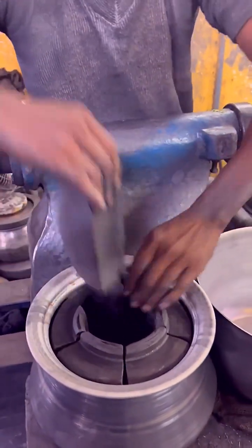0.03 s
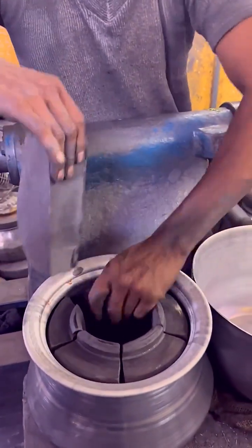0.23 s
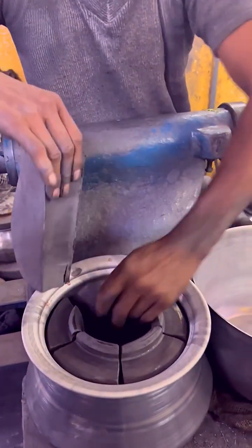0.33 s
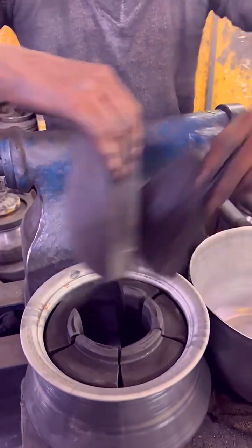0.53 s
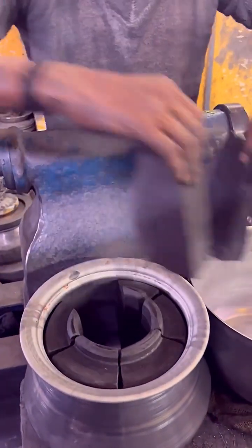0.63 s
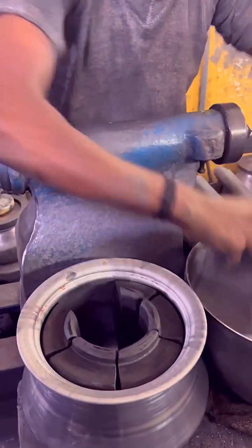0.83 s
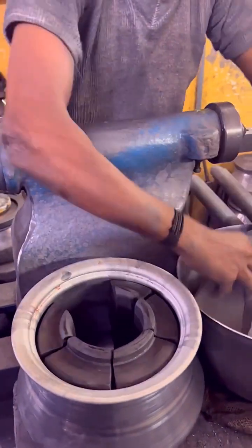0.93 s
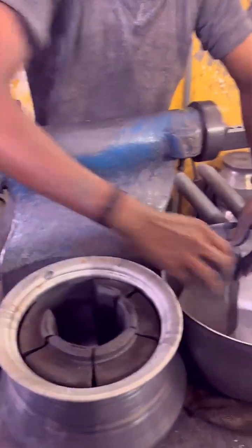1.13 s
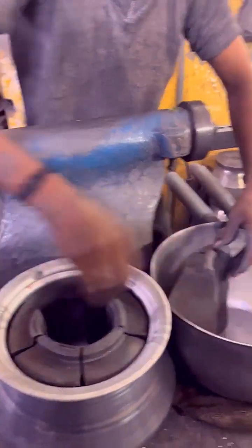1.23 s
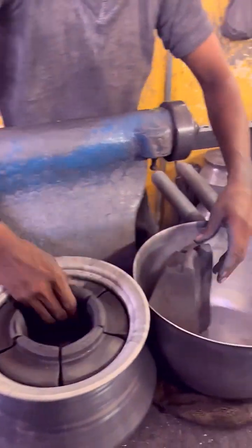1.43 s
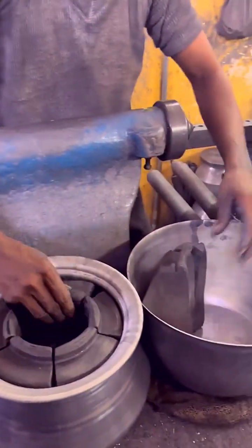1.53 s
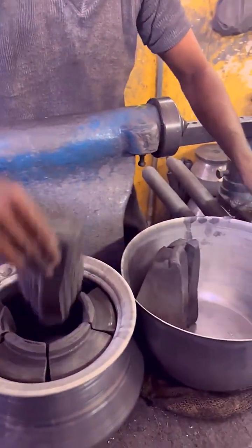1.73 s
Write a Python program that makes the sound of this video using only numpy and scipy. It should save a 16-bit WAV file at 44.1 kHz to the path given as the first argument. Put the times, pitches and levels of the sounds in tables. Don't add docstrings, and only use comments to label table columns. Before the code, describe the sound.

Heavy metal mould pieces knock, scrape and boom into a thin basin over low workshop machine rumble

```python
import sys
import numpy as np
from scipy import signal
from scipy.fft import rfft, irfft
from scipy.io import wavfile
from scipy.ndimage import uniform_filter1d

SR = 44100
rng = np.random.default_rng(int(sys.argv[2]) if len(sys.argv) > 2 else 0)


def field_ratio(decibels):
    return 10 ** (np.asarray(decibels, dtype=float) / 20)


def file_out(sig):
    cols = np.atleast_2d(sig).T
    lim = np.clip(cols, -1, 1)
    pcm = np.round(lim * 32767).astype(np.int16)
    wavfile.write(sys.argv[1], SR, pcm)


N = 79380
T = np.arange(N) / SR
F = np.fft.rfftfreq(N, 1 / SR) + 1


def read(table, col=1):
    a = np.array(table, float)
    return np.interp(np.log(F), np.log(a[:, 0]), a[:, col])


def unit(x):
    return x / np.sqrt(np.mean(x ** 2))


def ring(push, hz, t60):
    r = np.exp(-np.log(1000) / (max(t60, .004) * SR))
    gain = np.sqrt((1 - r * r) / 2)
    return signal.lfilter(gain * np.array([1, 0, -1]), [1, -2 * r * np.cos(2 * np.pi * hz / SR), r * r], push)


def burst(attack, decay, size=16384):
    t = np.arange(size) / SR
    rise = np.minimum(t / max(attack, 1e-4), 1)
    return rise * np.exp(-np.maximum(t - attack, 0) / max(decay, 1e-3))


def add(out, x, start, db):
    i = int(start * SR)
    x = x[:N - i]
    peak = np.sqrt(2 * uniform_filter1d(x ** 2, size=256).max())
    out[i:i + len(x)] += field_ratio(db) * x / peak


def walk(rate):
    k = int(SR / rate)
    held = np.repeat(rng.standard_normal(64), k)[:N]
    return 0.93 * uniform_filter1d(uniform_filter1d(held, k), k)


# start_s, level_db, pitch_hz,
# grit_level_db, grit_decay_s
KNOCKS = [(0.3296, -14, 1438, -19.5, 0.012), (.3626, -21.5, 2210, -22.5, 0.01),
          (0.532, -17.5, 1000, -24.5, 0.027), (0.539, -23, 1400, -33, 0.011), (0.38, -24, 1400, -35, .01),
          (.2195, -14, 2400, -33, .005), (.3935, -16, 2500, -27, .005), (.4625, -12, 2430, -23, 0.0055),
          (.692, -12.5, 2420, -25, 0.0044), (.917, -13, 1540, -26, 0.0046), (.944, -15, 850, -27, .004),
          (.778, -14.5, 772, -35, 0.0051), (.782, -10, 570, -39, .006), (.779, -21, 1345, -30, 0.022),
          (.790, -16, 765, -26.5, 0.027), (0.87, -21, 1420, -30, .01), (.861, -16, 750, -15, 0.0091),
          (.868, -22, 5500, -19, 0.0064), (.885, -22, 525, -23, .01), (.934, -13, 600, -18, 0.0056),
          (.928, -27, 2000, -21, 0.0055), (0.8564, -13, 2920, -8, 0.014), (0.9166, -6, 1200, -18, 0.025),
          (.943, -9, 1520, -13, 0.0059), (.961, -20.5, 1300, -15.5, 0.014),
          (.978, -23, 1470, -21.5, 0.0065), (1.055, -23, 780, -34, .015), (0.987, -24, 2890, -23, 0.067),
          (1.0375, -14, 2026, -17.5, 0.021), (1.069, -22, 1300, -30, 0.02),
          (1.3603, -23.5, 1970, -32, 0.033), (1.4464, -24.5, 1950, -32, 0.075),
          (1.41, -35, 1000, -41, 0.018), (1.507, -24.5, 1050, -49, 0.018), (1.635, -27, 1486, -34, 0.035)]
# ratio to pitch, level_db
KNOCK_PARTIALS = [(.8, -9.5), (0.998, 7), (1.13, -19), (1.329, -12.5)]
# freq_hz, level_db per Hz
GRIT_COLOUR = [(150, -22), (600, 4.5), (1200, -13), (3000, -3.5), (5500, -4), (7500, -13.5), (11000, -14),
               (16000, -26)]
KNOCK_T60_S, KNOCK_CONTACT_S, KNOCK_SNAP_DB = 0.033, 0.0037, 18


def mould():
    out, grit = np.zeros(N), np.zeros(N)
    for start, db, hz, grit_db, grit_decay in KNOCKS:
        contact = burst(0, KNOCK_CONTACT_S)
        push = contact * rng.standard_normal(len(contact))
        push[0] = field_ratio(KNOCK_SNAP_DB)
        tone = sum(field_ratio(g) * ring(push, ratio * hz, KNOCK_T60_S) for ratio, g in KNOCK_PARTIALS)
        add(out, tone, start, db)
        grains = rng.standard_normal(len(contact)) * field_ratio(1.85 * rng.exponential(size=len(contact)))
        add(grit, burst(0.0018, grit_decay) * grains, start, grit_db)
    response = np.roll(irfft(field_ratio(2 * read(GRIT_COLOUR)), N), 512)[:1025]
    colour = signal.minimum_phase(response * np.hanning(1025))
    return out + signal.fftconvolve(grit, colour / np.sqrt(np.sum(colour ** 2)))[:N]


# start_s, level_db, attack_s, push_decay_s, pitch_hz
THUMPS = [(0.335, -17, 0.0011, 0.006, 292), (0.344, -17.5, 0.0011, 0.013, 328),
          (.43, -17, 0.0059, 0.0045, 251), (.872, -13.5, 0.0029, 0.0025, 253),
          (.885, -17.5, 0.0033, 0.0051, 360), (.952, -17, 0.0041, 0.011, 183),
          (.93, -17.5, 0.0046, 0.018, 388), (1.085, -19.5, 0.0054, 0.029, 385),
          (1.05, -19.5, 0.0045, 0.037, 520), (.895, -18, 0.0024, 0.0084, 239),
          (.925, -12.5, 0.0028, 0.025, 281), (.941, -7.5, 0.004, 0.0087, 314),
          (.958, -10.5, 0.0021, 0.0086, 336), (0.99, -13.5, 0.015, 0.045, 258),
          (1.044, -14, 0.0032, 0.011, 303.4), (1.071, -9.5, 0.0051, 0.038, 277),
          (1.136, -19.5, 0.0059, 0.025, 285.6), (1.19, -21.5, 0.011, 0.023, 283),
          (1.238, -33, 0.0063, 0.011, 286), (1.36, -16, 0.0074, 0.024, 301),
          (1.378, -22.5, 0.007, .015, 287.7), (1.445, -16, 0.0064, 0.049, 286),
          (1.479, -18.5, 0.0032, 0.028, 327), (1.514, -24, 0.011, 0.021, 295),
          (1.747, -29, 0.0053, 0.016, 310)]
# ratio to pitch, level_db, t60_s
HOLLOW_MODES = [(.46, -21, 0.05), (.62, -4, 0.068), (.86, 3.5, 0.1), (1, 11, 0.083), (1.07, -2.5, 0.097),
                (1.33, -11, 0.094), (1.68, -28, 0.12), (1.81, -4, 0.1), (2.27, -44, 0.1), (3.65, -8, 0.12),
                (5.05, -23, 0.21), (7.9, -6.5, 0.061)]


def hollow():
    out = np.zeros(N)
    for start, db, attack, decay, hz in THUMPS:
        e = burst(attack, decay)
        push = e * rng.standard_normal(len(e))
        add(out, sum(field_ratio(g) * ring(push, ratio * hz, t60) for ratio, g, t60 in HOLLOW_MODES), start, db)
    return out


# start_s, level_db, attack_s, decay_s, pitch_hz
SINGS = [(.334, -12, .008, .01, 295), (.428, -11, .009, .006, 250), (0.938, -7.5, 0.016, 0.019, 312),
         (1.036, -3, 0.018, 0.025, 300), (1.065, -2.5, 0.013, 0.022, 280), (1.098, -7, 0.015, 0.021, 291),
         (1.13, -13.5, .01, .03, 286), (1.185, -14, 0.02, 0.03, 286), (1.365, -12, .02, 0.02, 290),
         (1.41, -17, .02, .03, 300), (1.465, -14, 0.015, 0.015, 300), (1.505, -15, .015, .03, 320)]
SING_REST_HZ, SING_WANDER, SING_THROB_DB = 290, 0.01198, 2.5


def sing():
    shape, bend = np.zeros(N), np.zeros(N)
    for start, db, attack, decay, hz in SINGS:
        add(shape, burst(attack, decay), start, db)
        bend[int(start * SR):] = hz
    glide = uniform_filter1d(np.where(bend > 0, bend, SING_REST_HZ), size=512)
    pitch = glide * (1 + SING_WANDER * walk(24.01))
    throb = field_ratio(SING_THROB_DB * walk(29.96))
    return shape * throb * np.sin(2 * np.pi * np.cumsum(pitch) / SR)


# start_s, level_db, attack_s, rattle_decay_s
CLINKS = [(0, -24, 0.0011, 0.038), (0.218, -11, 0.0025, 0.015), (0.394, -13, 0.0014, 0.024),
          (0.43, -30, .002, 0.013), (0.4626, -11.5, 0.00063, 0.049), (0.5203, -16, 0.001, 0.0064),
          (0.527, -12, 0.001, 0.016), (0.692, -10, 0.0011, 0.0086), (0.7498, -19.5, 0.002, 0.0064),
          (0.917, -14.5, 0.00084, 0.025), (1.179, -28, 0.0039, 0.038), (1.221, -29, 0.0058, 0.03),
          (1.291, -31, 0.012, 0.021), (1.622, -22, 0.0033, 0.031), (1.678, -28, 0.0068, 0.0086)]
# freq_hz, level_db, t60_s, spread_hz
STEEL_MODES = [(1437, -0.5, 0.05, 74), (2399, 1, 0.08, 15), (2550, -0.5, 0.065, 14), (2510, -3, 0.017, 136),
               (3478, -7, 0.089, 64), (4856, -6, 0.057, 288), (6570, -13, 0.048, 75),
               (6490, -0.5, 0.22, 27), (6570, 2, 0.2, 88.5), (8530, -1.5, 0.12, 260),
               (8880, -0.5, 0.13, 219), (9230, -7.5, 0.12, 247), (10900, -52, 0.056, 560)]
STEEL_SCATTER_DB, STEEL_SNAP_DB, STEEL_HISS_DB = 3.5, 21, 8
TICK_DB, TICK_S = 9, .0015


def steel():
    out, size = np.zeros(N), 8192
    for start, db, attack, decay in CLINKS:
        tick = field_ratio(TICK_DB) * burst(0, TICK_S, size) * 0.00072 / max(attack, .001)
        rattle = field_ratio(1.8 * np.repeat(rng.standard_normal(size // 64), 64))
        push = (burst(attack, decay, size) + tick) * rng.standard_normal(size) * rattle
        push[int(attack * SR / 2)] += field_ratio(STEEL_SNAP_DB)
        modes = np.zeros(size)
        for hz, g, t60, spread in STEEL_MODES:
            for level, offset in rng.standard_normal((6, 2)):
                modes += field_ratio(g + STEEL_SCATTER_DB * level) * ring(push, hz + spread * offset, t60)
        hiss = ring(push * burst(0, 0.0013, size), 7300, .002)
        add(out, modes + field_ratio(STEEL_HISS_DB) * hiss, start, db)
    return out


# start_s, level_db, pitch_hz, decay_s
THUDS = [
    (.9, -22, 95, .02),
    (.955, -16, 140, .025),
    (1.075, -18, 135, .045),
    (1.44, -24, 95, .02),
]


def bench():
    out = np.zeros(N)
    for start, db, hz, decay in THUDS:
        e = burst(.015, decay)
        add(out, e * np.sin(2 * np.pi * hz * T[:len(e)]), start, db)
    return out


# freq_hz, level_db per Hz
RUMBLE = [(30, -10), (55, -0.5), (300, -3), (800, -15.5), (1600, -15.5), (3000, -21), (7000, -27.5),
          (15000, -40.5)]
# freq_hz, rms_db, width_hz
HUM = [(51.2, -42.5, 1), (112.6, -38.5, 4.4), (488, -37.5, 32), (626, -47.5, 3), (751.8, -39.5, 12),
       (843, -42, 5.3), (1456, -42.5, 55), (2320, -70, 90)]
RUMBLE_DB, SWELL_DB, FLICKER_DB = -28, 2.5, 3


def shop():
    noise = rfft(rng.standard_normal(N)) * field_ratio(read(RUMBLE))
    rumble, swell = np.zeros(N), walk(0.5)
    for hz in 25 * 2 ** np.arange(0, 10, .5):
        window = np.cos(np.pi * np.clip(np.log2(F / hz), -.5, .5)) ** 2
        rumble += irfft(noise * window, N) * field_ratio(SWELL_DB * swell + FLICKER_DB * walk(12.42))
    hum = sum(field_ratio(db) * unit(ring(rng.standard_normal(N), hz, 1.58 / width)) for hz, db, width in HUM)
    return field_ratio(RUMBLE_DB) * unit(rumble) + hum


ROOM_DB, ROOM_T60_S, ROOM_RISE_S, ROOM_DULL_HZ = -9.5, 0.35, 0.0063, 5500


def room(near):
    t = T[:N // 2]
    tail = rng.standard_normal(N // 2) * np.exp(-np.log(1000) * t / ROOM_T60_S) * np.minimum(t / ROOM_RISE_S, 1)
    tail = signal.lfilter(*signal.butter(1, ROOM_DULL_HZ, fs=SR), tail)
    return field_ratio(ROOM_DB) * signal.fftconvolve(near, tail / np.sqrt(np.sum(tail ** 2)))[:N]


# freq_hz, correlation
PORT_LIKENESS = [(60, .998), (200, .97), (650, 0.56), (1850, 0.71), (2500, -0.39), (2800, -0.75), (3400, -0.36),
                 (5250, 0.31),
                 (5700, -1.5), (6250, -1.01), (7400, 0.15), (7950, .99), (8300, 0.69), (9450, 1),
              (10100, -0.72), (11200, -0.45),
                 (12600, -0.26), (13200, -.95), (13900, -0.75), (14900, -0.17), (16500, -0.36)]
# freq_hz, phase_turns, share
FOLLOW = [(330, -.38, .8), (800, -.33, .45), (1500, -.5, .1), (2100, -.72, .6), (5600, -.71, .55),
          (6500, -.27, .7), (7800, -.5, 0), (9500, -.73, .4)]
SMEAR_S, SIDE_TOP_HZ = 0.018, 14500


def ports(metal):
    sound = metal + rfft(shop())
    smear = rfft(rng.standard_normal(N) * np.exp(-T / SMEAR_S))
    smear = smear / np.sqrt(uniform_filter1d(np.abs(smear) ** 2, size=200))
    like = np.clip(read(PORT_LIKENESS), -1, 1)
    share = np.maximum(np.clip(read(FOLLOW, col=2), 0, 1), -like)
    mid = irfft(sound * np.sqrt((1 + like) / 2), N)
    turned = share * np.exp(2j * np.pi * read(FOLLOW)) * sound
    scattered = np.sqrt(1 - share ** 2) * (smear * metal + rfft(shop()))
    side = irfft((turned + scattered) * np.sqrt((1 - like) / 2) * (F < SIDE_TOP_HZ), N)
    return np.array([mid + side, mid - side])


def scene():
    near = mould() + hollow() + steel() + bench()
    return ports(rfft(near + room(near) + sing()))


def low_pass(x):
    return signal.sosfilt(signal.butter(12, 16660, fs=SR, output="sos"), x)


def record(dry):
    rounded = np.tanh(0.85 * dry) / 0.78
    top_cut = signal.ellip(8, .2, 60, 15600, fs=SR, output="sos")
    mix = signal.sosfilt(top_cut, rounded)
    return low_pass(mix)


dry = scene()
out = record(dry)
file_out(out)
```